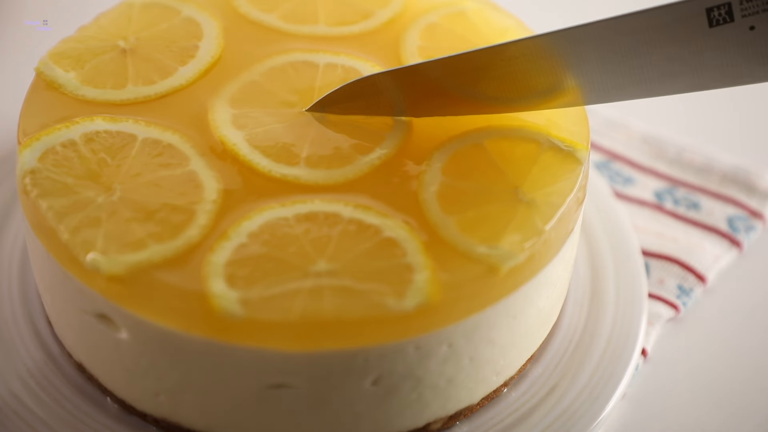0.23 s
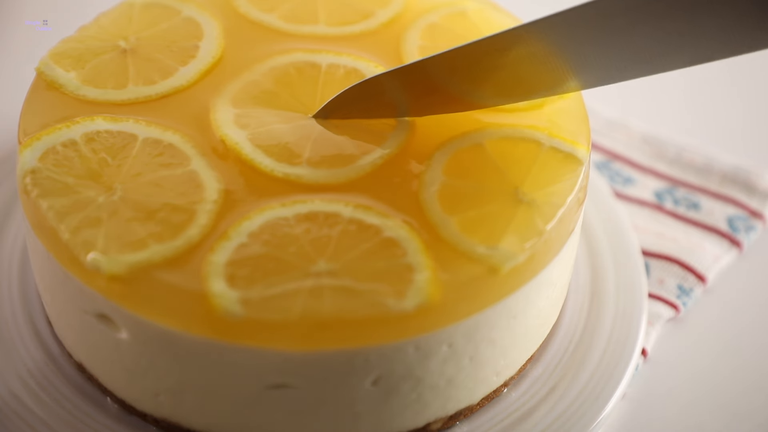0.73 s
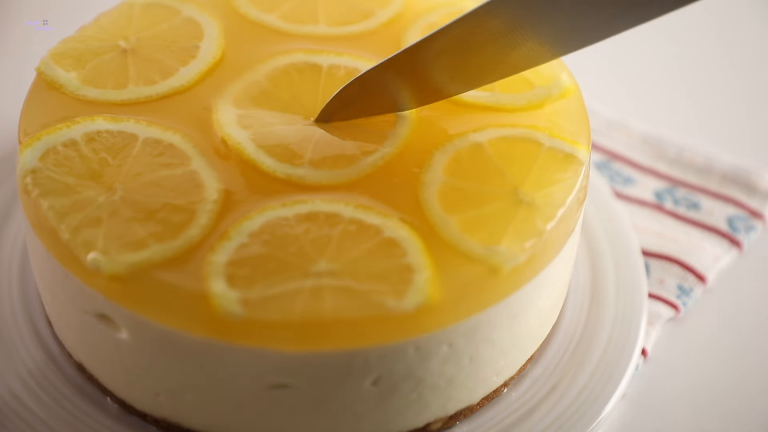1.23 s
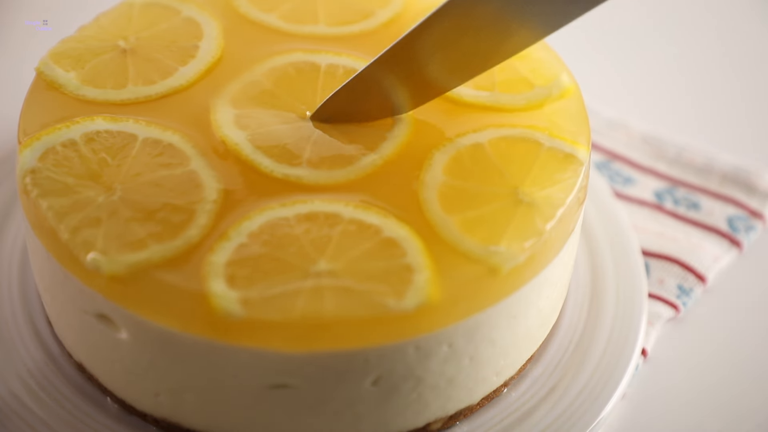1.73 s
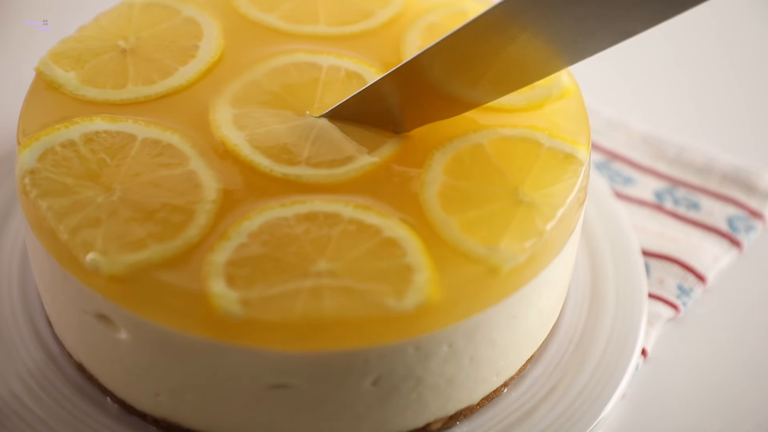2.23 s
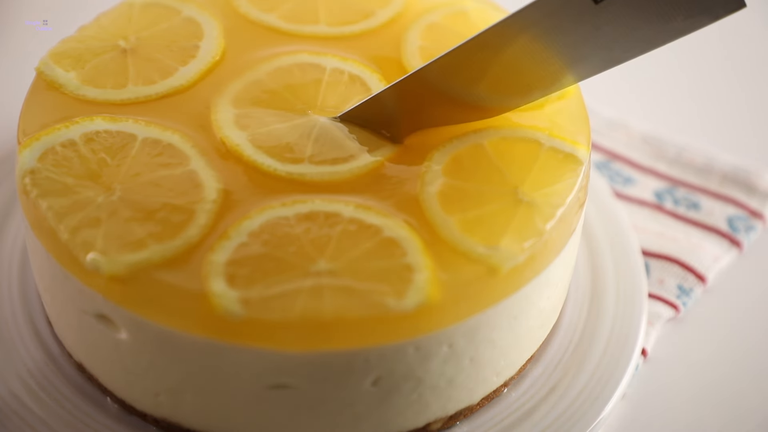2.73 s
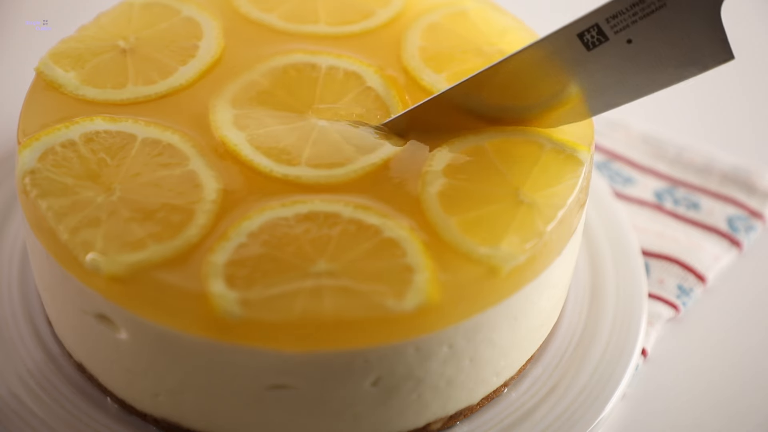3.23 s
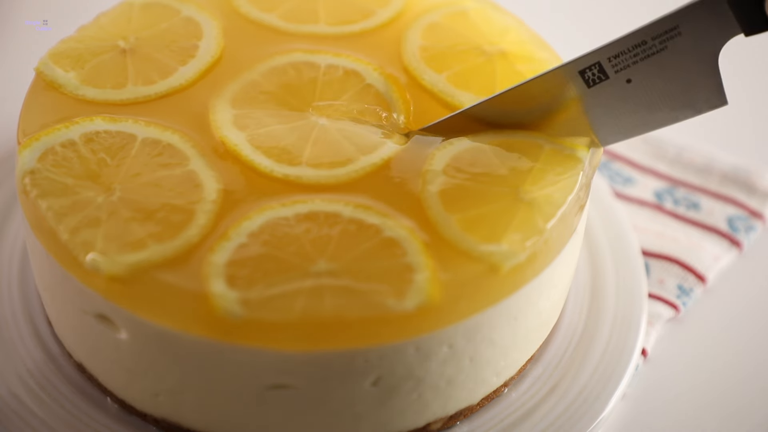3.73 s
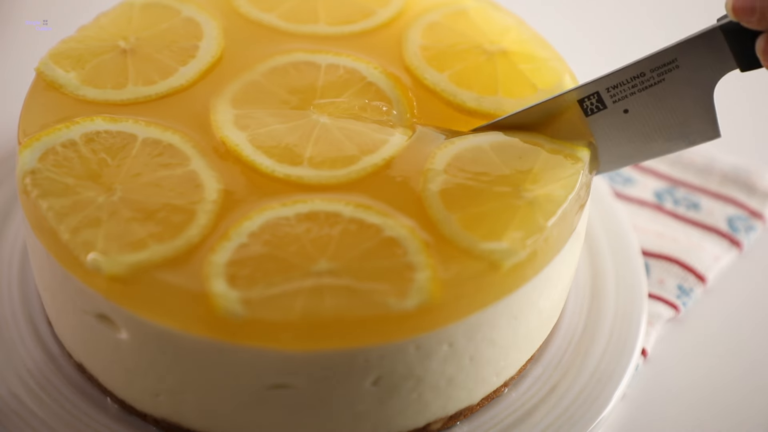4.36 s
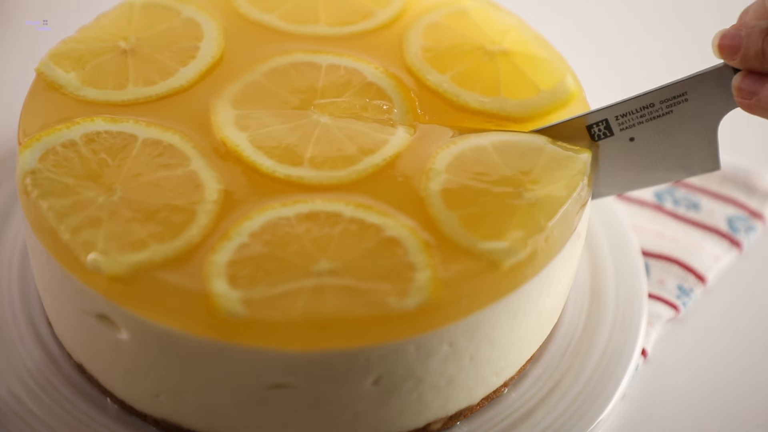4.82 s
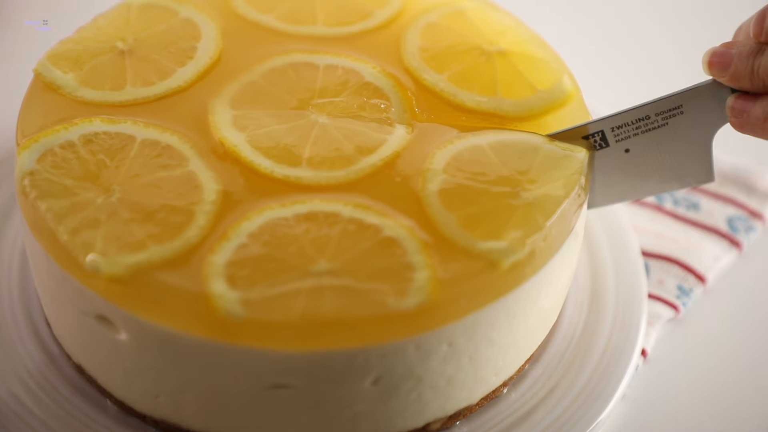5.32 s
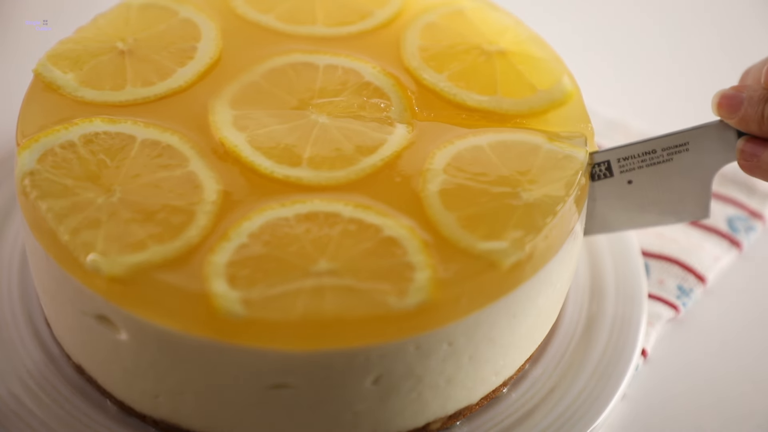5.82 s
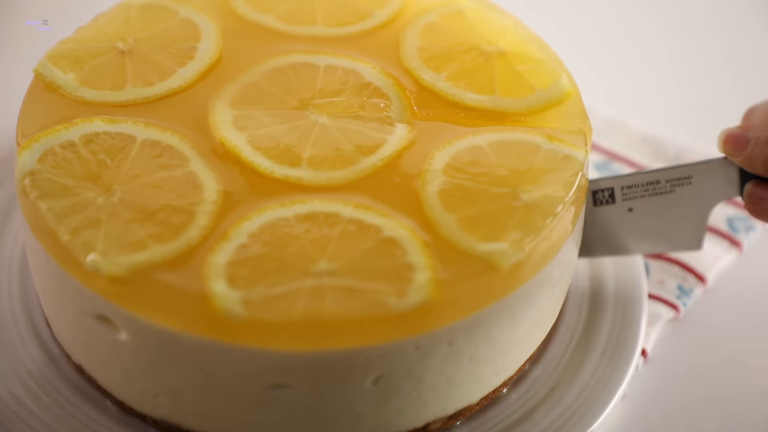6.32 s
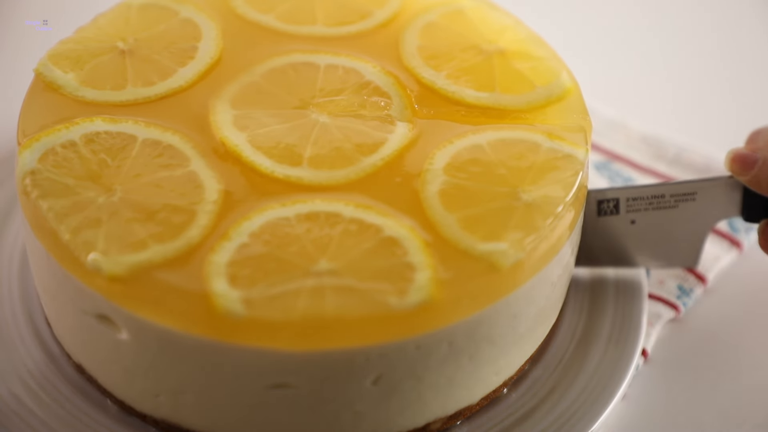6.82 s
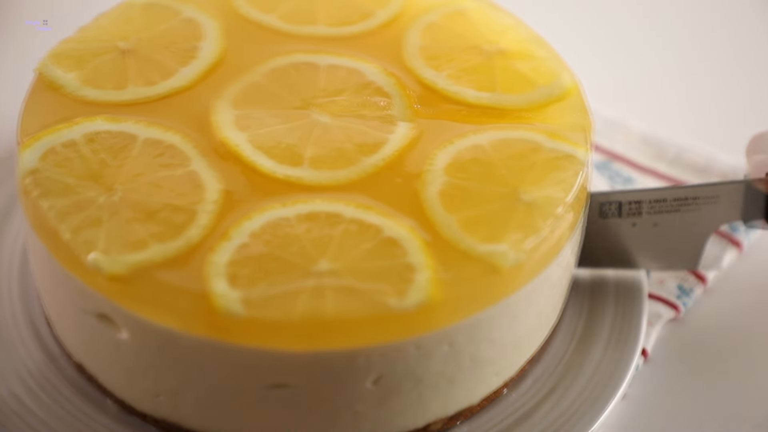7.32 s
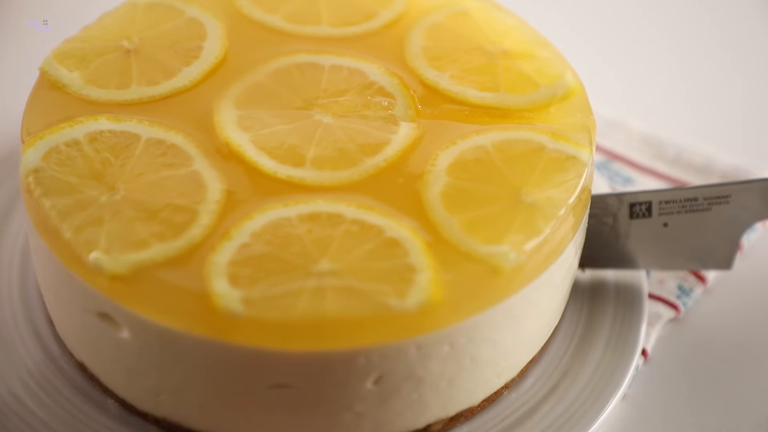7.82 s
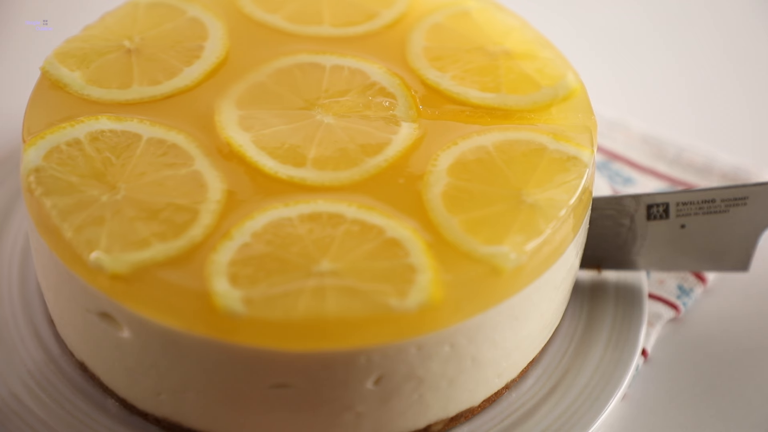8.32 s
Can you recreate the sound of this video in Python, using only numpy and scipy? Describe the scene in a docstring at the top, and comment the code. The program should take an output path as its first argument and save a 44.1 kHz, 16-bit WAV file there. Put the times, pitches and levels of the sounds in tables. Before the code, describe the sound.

A quiet room heard close to a plate, with steady soft hiss over low hum. Almost nothing until a small tick at 0.9 s. At 1.6-1.9 s a cluster of crisp bright snaps tears with a fine rustle, over soft knocks and a low table thump. A faint shift around 2.8 s leads to another sharp snap and short tear at 3.1 s, with a dull knock. Isolated ticks come at 3.9-4.1 s. From about 4.7 s the crumb base begins to crunch in light gritty strokes, denser by 5.4, with a stronger snap at 5.7. From 6.2 s the crunching swells rapidly to the loudest crack at 6.35 s, with plate knock and table thud. Another crunchy stroke at 6.5 and a thin ringing scrape fade by 6.8 s. Afterwards the hum sinks slightly; only tiny clicks until 8.5 s.

```python
"""A quiet room, heard by a microphone close to a plate: it hisses over a low hum, and soft knocks reach the plate.
A kitchen knife is pressed down through a jelly-topped cake; citrus rind and jelly snap as short ringing breaks
and tear in noise rustles, while plate and table answer through resonances.
The cake shifts softly, then the crumb base crunches in strokes of clumped grit through crumb and blade filters.
After the loudest crack the edge grazes glaze in thin modes and coasts to rest; a few small snaps follow."""
import sys
import numpy as np
from scipy import signal
from scipy.fft import rfft, irfft, next_fast_len
from scipy.io import wavfile
from scipy.ndimage import uniform_filter1d, map_coordinates

SR = 44100
rng = np.random.default_rng(int(sys.argv[2]) if len(sys.argv) > 2 else 0)


def pcm_store(signal):
    """Save signal as 16-bit PCM."""
    levels = np.round(np.clip(np.atleast_2d(signal), -1, 1) * 32767)
    wavfile.write(sys.argv[1], SR, levels.astype(np.int16).T)


def field_ratio(decibels):
    """Amplitude ratio for a level in dB (20 dB per decade); scalars and array-likes work."""
    return 10 ** (np.asarray(decibels, dtype=float) / 20)


N = 378378


def unit(x):
    """Scaled to rms 1."""
    return x / np.sqrt(np.mean(x ** 2) + 1e-20)


def along(points, hz):
    """(Hz, value) points read on a log frequency axis."""
    f, v = np.transpose(points)
    return np.interp(np.log(hz + 1), np.log(f + 1), v)


def gains(tables):
    """One gain per sample for each dB column, practically silent (-150 dB) outside the tables."""
    total = 0
    t = np.arange(N) / SR
    for rows in tables:
        s, *columns = np.transpose(rows)
        total = np.maximum(total, [field_ratio(np.interp(t, s, c, -150, -150)) for c in columns])
    return total


def filtered(x, response):
    """x shaped by a complex response of frequency."""
    m = next_fast_len(len(x) + SR // 2)
    return irfft(rfft(x, m) * response(np.fft.rfftfreq(m, 1 / SR)), m)[:len(x)]


def shaped(points):
    """Response that follows (Hz, dB) points."""
    return lambda hz: field_ratio(along(points, hz))


def resonant(modes):
    """Causal response of (Hz, width, dB) resonances, added with alternating sign."""
    def response(f):
        total = 0
        for k, (c, w, db) in enumerate(modes):
            total = total + (-1) ** k * field_ratio(db) * 1j * f * w / (c * c - f * f + 1j * f * w)
        return total
    return response


def hump(centre_hz, octaves):
    """A broad bell on a log frequency axis."""
    return lambda hz: np.exp(-(np.log2(hz / centre_hz + 1e-9) / octaves) ** 2)


def blend(x, a, b, share):
    """Crossfade at even power from x through response a to x through response b."""
    return np.sqrt(1 - share) * unit(filtered(x, a)) + np.sqrt(share) * unit(filtered(x, b))


def grit(rate, spread_db):
    """Random impulses of either sign, a few much larger than the rest; rate per second."""
    chance, sign, size = rng.random((3, N))
    sizes = field_ratio(-spread_db * np.log(size + 1e-4))
    return unit((chance < rate / SR) * np.sign(sign - .5) * sizes)


def wobble(rate):
    """A smooth random curve, rate knots a second."""
    return map_coordinates(rng.standard_normal(N // 400), [np.arange(N) * rate / SR])


def breaks(rate, spread_db, smooth):
    """Grit over a smoother rub, both coming in clumps."""
    return field_ratio(1.76 * wobble(70)) * (grit(rate, spread_db) + smooth * rng.standard_normal(N))


def burst(late, hz, cycles):
    """A ring that swells in a fraction of a cycle and dies after a few."""
    turns = late.clip(0) * hz
    swell = 1 - np.exp(-turns / .5)
    return swell * np.exp(-3 * turns / max(cycles, .3)) * np.sin(2 * np.pi * turns)


# Microphone hiss. Each row: frequency in Hz, relative level in dB.
HISS_SPECTRUM = [(100, -21.5), (170, -6), (288, -2.5), (355, -5.5), (437, -3), (548, -5.5), (580, -7),
                 (1380, -6.5), (2680, -8.5), (8480, -6), (15500, -15)]
# Low hum of the room, also the colour of the table rumble. Each row: frequency in Hz, relative level in dB.
HUM_SPECTRUM = [(20, -21), (38, -7.5), (58, -13), (74, -4), (87, -5.5), (105, -5.5), (124, -15), (156, -12),
                (190, -19), (290, -55.5), (480, -120)]
# Narrow lines in the hum. Each row: frequency in Hz, width in Hz, relative level in dB.
HUM_LINE_MODES = [(37.3, 2, -1.5), (92.1, 4.4, 8.5), (149.5, 2.1, 2)]
# The hum sinks for a while. Each row: time in seconds, change of level in dB.
HUM_SINKS = [(6.7, -1), (7.7, -4.5), (8.58, -3.5)]


def background():
    """Microphone hiss and room hum: shaped noise, the hum wavering in narrow resonances."""
    hiss = unit(filtered(rng.standard_normal(N), shaped(HISS_SPECTRUM)))
    hum_response = lambda hz: shaped(HUM_SPECTRUM)(hz) + np.abs(resonant(HUM_LINE_MODES)(hz))
    hum = unit(filtered(rng.standard_normal(N), hum_response))
    hum_db = -57.5 + np.interp(np.arange(N) / SR, *np.transpose(HUM_SINKS))
    return field_ratio(-56.0) * hiss + field_ratio(hum_db) * hum


# Plate modes. Each row: frequency in Hz, width in Hz, relative level in dB.
PLATE_MODES = [(414, 92, -8.5), (516, 69, 0.5), (630, 97, -1.5), (807, 94, -4)]
# Knocks passed on to the plate. Each row: contact in seconds, relative strength in dB, pitch in Hz.
PLATE_KNOCKS = [(0.117, -48, 487), (0.898, -37, 576), (1.001, -45, 646), (1.617, -29, 552),
                (1.62, -25, 484), (1.712, -29.5, 533), (1.779, -44, 390), (1.799, -41, 409),
                (1.813, -27, 511), (1.884, -47, 342), (1.902, -37, 506), (2.923, -35.5, 573),
                (2.979, -40.5, 406), (3.079, -44, 463), (3.097, -35, 573), (3.108, -22, 431),
                (3.11, -20.5, 720), (3.111, -31, 396), (3.796, -44, 692), (3.943, -40, 479),
                (4.053, -43, 484), (4.088, -46, 425), (4.289, -44.5, 646), (4.835, -39, 584),
                (5.038, -31.5, 528), (5.159, -36, 638), (5.279, -33, 498), (5.325, -43, 538),
                (5.691, -26, 630), (5.703, -24, 557), (5.719, -24, 493), (6.034, -43, 633),
                (6.118, -34.5, 353), (6.167, -26, 630), (6.267, -23, 635), (6.3, -18.5, 528),
                (6.352, -1.5, 484), (6.375, -16, 301), (6.517, -24, 824), (6.815, -43.5, 525),
                (7.354, -41.5, 385), (7.529, -41.5, 603), (7.705, -36.5, 600), (7.715, -36.5, 704),
                (7.766, -38, 708), (8.058, -44, 417), (8.428, -48.5, 315), (8.515, -38, 322),
                (8.517, -37, 655)]


def knocks():
    """A soft push of a few low cycles and a shorter overtone, just after contact, with the plate's own modes."""
    cycles, delay_s = 3.34, .0018
    out, blows = np.zeros(N + SR), np.zeros(N)
    t = np.arange(2000) / SR - delay_s
    for s, db, hz in PLATE_KNOCKS:
        push = burst(t, hz, cycles) + 0.32 * burst(t, 1.544 * hz, cycles)
        out[round(s * SR):][:len(t)] += field_ratio(db + 4.5) * push
        blows[round((s + delay_s) * SR)] = field_ratio(db + 13)
    return out[:N] + filtered(blows, resonant(PLATE_MODES))


# Table top modes. Each row: frequency in Hz, t60 in seconds.
TABLE_MODES = [(76, 0.28), (129, 0.32), (160, 0.19)]
# Pushes that shake the table. Each row: start in seconds, strength in dB,
# place in mode steps (0 stirs the first mode most, 2 the third).
TABLE_PUSHES = [(.887, -48, 2), (1.624, -28.5, .05), (1.712, -29.5, .03), (1.814, -37, .1),
                (3.115, -22, 0.14), (3.791, -45, 2.4), (5.07, -39, .4), (5.459, -30.5, .5),
                (5.55, -27.5, .03), (5.691, -27, 0.28), (5.9, -43.5, 1.05), (5.961, -37, 0.94),
                (6.265, -29, 1.05), (6.342, -16.5, 0.96), (6.51, -47, .1), (6.64, -37.5, 0.97),
                (8.515, -35.5, 1.8)]


def table(pressure):
    """Three low modes ring after each push, the lower two under steady pressure, over a broad rumble."""
    place_db = 13.5  # loss of a mode one step from the place
    push_rumble_db, push_rumble_t60_s = -25.5, 0.83  # level under the push
    # lower mode, upper mode, broad rumble: dB at full pressure, share of the pressure swing in dB
    shake_db, shake_follows = (-23.5, -11, -28), (0.76, 0.94, .65)
    smoothing_s = .04
    out, after, t = np.zeros(N + SR), np.zeros(N + SR), np.arange(SR // 2) / SR
    onset = 1 - np.exp(-t / 0.011)
    modes = np.array([field_ratio(-60 * t / t60) * np.sin(2 * np.pi * hz * t) * onset for hz, t60 in TABLE_MODES])
    for s, db, place in TABLE_PUSHES:
        steps = np.abs(np.arange(len(TABLE_MODES)) - place)
        out[round(s * SR):][:len(t)] += field_ratio(db - place_db * steps ** 1.2) @ modes
        after[round(s * SR):][:len(t)] += field_ratio(db + push_rumble_db - 60 * t / push_rumble_t60_s)
    load = np.abs(uniform_filter1d(pressure, size=round(smoothing_s * SR)))
    low, high, broad = (field_ratio(db) * load ** share for db, share in zip(shake_db, shake_follows))
    rumble = lambda mode: unit(signal.fftconvolve(grit(400, spread_db=3.0), mode)[:N])
    deep = unit(filtered(rng.standard_normal(N), shaped(HUM_SPECTRUM)))
    return out[:N] + low * rumble(modes[0]) + high * rumble(modes[1]) + (broad + after[:N]) * deep


# Snaps under the edge. Each row: start in seconds, relative level in dB, pitch of the bright ring in Hz,
# relative level of the dull part in dB.
EDGE_SNAPS = [(0.8876, -26, 5900, -21), (1.62, -20, 7660, -40), (1.6217, -22, 4730, -16),
              (1.6247, -17.5, 9490, -22), (1.7146, -22.5, 5070, -23), (1.8144, -31, 4930, -8),
              (1.8874, -39, 9030, -7.5), (1.9042, -28, 5930, -10.5), (2.795, -33, 8150, -13.5),
              (2.9242, -37, 5060, -7.5), (3.1079, -21.5, 5750, -2), (3.1097, -21.5, 4500, 3.5),
              (3.1133, -22, 5200, -14), (3.1921, -39, 9500, -25), (3.3299, -44, 6710, 0),
              (3.6803, -34, 4860, -20), (3.9457, -22.5, 6000, -19.5), (4.0553, -22, 4480, -8),
              (4.7396, -39, 7020, -10), (4.8287, -42.5, 6560, -2), (4.9383, -38, 5600, -9.5),
              (5.024, -34, 6840, -14), (5.0681, -29.5, 5710, -7.5), (5.1373, -33.5, 7550, -5.5),
              (5.2597, -37, 7420, -18), (5.2807, -40, 7370, 1.5), (5.3653, -32, 7360, -14),
              (5.4378, -33, 8490, -14), (5.4583, -24, 6220, -20), (5.4684, -29, 7240, -21),
              (5.5089, -26.5, 6400, -19), (5.5596, -22, 7600, -24), (5.5734, -29, 6690, -20),
              (5.588, -27.5, 5170, -24), (5.692, -14, 7130, -20), (5.7047, -19, 4800, -17),
              (5.7166, -36, 4930, -16), (5.878, -24.5, 9200, -21), (5.9863, -32, 8400, -6.5),
              (6.036, -29.5, 6690, -8.5), (6.1616, -34, 5620, 0), (6.1729, -26.5, 6650, -11.5),
              (6.205, -25.5, 5040, -11), (6.226, -25, 4500, -19.5), (6.2668, -13, 6240, -18.5),
              (6.2951, -12, 5170, -16.5), (6.3025, -14, 8000, -15), (6.3096, -7.5, 4850, -22.5),
              (6.316, -6, 8000, -20), (6.3285, -13.5, 5040, -1), (6.342, -7.5, 8240, -1),
              (6.3521, 2, 8170, -13), (6.3559, -7, 6890, -4), (6.384, -19.5, 5820, -5),
              (6.4247, -14.5, 7060, -7), (6.4347, -19, 4790, -14), (6.4663, -24, 6740, -8),
              (6.508, -25.5, 4500, -2.5), (6.5163, -20.5, 6230, -7.5), (6.536, -16, 5800, -13),
              (6.559, -15.5, 9100, -12), (6.5684, -16.5, 9100, -21), (6.5865, -23, 8700, -27),
              (6.594, -20.5, 6860, -27), (6.615, -27, 7030, -18), (6.634, -23.5, 6740, -8.5),
              (6.6997, -38, 9150, -9), (6.822, -38, 5780, -3.5), (7.3534, -30.5, 6870, -8.5),
              (7.509, -37.5, 5370, -8), (7.539, -33.5, 8370, -16), (7.5987, -29.5, 8900, -38),
              (7.7053, -40, 5470, -16), (7.7686, -38, 6220, -9), (7.956, -34, 5360, -20),
              (8.2056, -40.5, 5390, -9), (8.3968, -41.5, 6710, -3), (8.4788, -26, 8700, -20),
              (8.4914, -36, 6680, -9)]


def snaps(rows):
    """Each snap is a short tear of several breaks, with a bright ring and a duller, lower part."""
    base_cycles, tear_s = 2.31, 0.001568  # cycles of a 6 kHz, -25.5 dB snap
    cycles_grow = .12  # strong snaps ring longer: dB of cycles per dB of strength
    out, t = np.zeros(N + SR), np.arange(600) / SR
    for s, db, hz, dull_db in rows:
        when, bend, weak, low = rng.random((4, 5, 1))
        when[0], bend[0], weak[0] = 0, .5, 0  # the first break is the strongest
        late, size = t - tear_s * when, field_ratio(-16 * weak)
        cycles = base_cycles * (hz / 6000) ** .6 * field_ratio(cycles_grow * (db + 25.5))
        bright = np.sum(size * burst(late, hz * np.exp(.35 * (bend - .5)), cycles), axis=0)
        dull = np.sum(size * burst(late, 1600 * np.exp(1.0 * low), 1.12), axis=0)
        snap = bright / bright.max() + field_ratio(dull_db + 5) * dull / dull.max()
        out[round(s * SR):][:len(t)] += field_ratio(db) * snap

    def less_top(hz):  # the snaps lose their top above about 10 kHz
        x = hz / 9800
        return 1 / (1 + 1.5j * x - x ** 2) / (1 + .7j * x - x ** 2)
    return filtered(out[:N], less_top)


# Bright colour of tearing rind. Each row: frequency in Hz, relative level in dB.
RIND_SPECTRUM = [(2060, -48), (3500, -13), (4720, 4.5), (7080, 2.5), (12800, -6), (15500, -25)]
# The rind goes on tearing after a big snap. Each row: peak in seconds, rustle in dB,
# relative level of the dull part in dB, t60 of the fray in seconds.
RIND_TEARS = [(1.62, -25.5, -35.5, 0.23), (1.715, -35.5, -40.5, .25), (1.815, -44, -52, 0.14),
              (3.11, -31.5, -22.5, 0.19), (5.694, -38, -54, .3), (7.542, -53, -58, .1)]


def tears():
    """Fibres part in a fine, even, bright rustle: a fast build-up, a short rip, a longer fray."""
    rise_db_per_s, rip_t60_s, fray_start_db = 4500, 0.033, -11
    level, t = np.zeros((2, N)), np.arange(N) / SR
    for s, rustle_db, dull_db, fray_s in RIND_TEARS:
        late = (t - s).clip(0)
        rise = field_ratio(rise_db_per_s * (t - s).clip(None, 0))
        rip = field_ratio(-60 * late / rip_t60_s)
        fray = field_ratio(fray_start_db - 60 * late / fray_s)
        rustle = field_ratio(rustle_db) * np.maximum(rip, fray)
        dull = field_ratio(dull_db) * np.maximum(rip, field_ratio(-6.5) * fray)
        level += rise * [rustle, dull]
    fibres = grit(5000, spread_db=5.0) + 1.2 * rng.standard_normal(N)
    bright = level[0] * unit(filtered(fibres, shaped(RIND_SPECTRUM)))
    return bright + field_ratio(-3.5) * level[1] * unit(filtered(fibres, hump(2950, 0.53)))


# The cake shifts softly on the plate. Each row: time in seconds, relative level in dB.
CAKE_SHIFTS = [
    [(2.73, -71), (2.78, -51.5), (2.83, -50.5), (2.91, -74)],
    [(7.3, -74.5), (7.348, -65), (7.532, -63), (8.05, -69), (8.15, -70)],
]
# The pressed base. Each row: frequency in Hz, width in Hz, relative level in dB.
BASE_MODES = [(228.4, 100, -9), (292, 42, 0), (364, 57, -8)]


def pressed_plate(coarse, pressure, hard):
    """Coarse grit drives the plate under pressure and shifts; in the hard base the grind deepens."""
    force = pressure + gains(CAKE_SHIFTS)[0]
    return force * blend(coarse, resonant(PLATE_MODES), resonant(BASE_MODES), 0.38 * hard)


# Colour of the crumbling. Each row: frequency in Hz, relative level in dB.
CRUMB_SPECTRUM = [(1500, -41.5), (3000, -18.5), (4700, -3.5), (6500, 3.5), (8500, 4), (10000, -3.5),
                  (12000, -30), (15500, -40.5)]


def crumbs(fine, crackle):
    """Crumbs break as fine grit, brightest around 7 kHz."""
    return crackle * unit(filtered(fine, shaped(CRUMB_SPECTRUM)))


# Upper blade modes. Each row: frequency in Hz, width in Hz, relative level in dB.
BLADE_UPPER = [(3260, 290, -9.5), (4030, 110, 2)]
# Lower blade modes. Each row: frequency in Hz, width in Hz, relative level in dB.
BLADE_LOWER = [(1224, 110, -10), (1844, 120, 7), (2440, 120, -12)]


def blade(fine, coarse, rubbing, hard):
    """In soft cake the rubbed blade hums in thin modes; in the hard base the scrape turns broad."""
    upper, lower = field_ratio((-1.5, -1.5))[:, None] * rubbing
    first_mode = resonant(BLADE_LOWER[:1])
    low_scrape = lambda hz: hump(1900, .7)(hz) + 1.55 * first_mode(hz) / field_ratio(BLADE_LOWER[0][2])
    steel = upper * blend(fine, resonant(BLADE_UPPER), hump(3780, 0.7), hard)
    return steel + lower * blend(coarse, resonant(BLADE_LOWER), low_scrape, hard)


# Strokes through the crumb base. Each row: time in seconds, then relative levels in dB
# of pressure, crumbling and blade rubbing.
BASE_STROKES = [
    [(4.55, -71, -66, -71), (4.59, -66, -60, -62.5), (4.75, -62.5, -61, -66), (4.832, -65, -65, -64.5),
     (4.968, -52.5, -58, -60.5), (5.084, -42.5, -44.5, -49.5), (5.134, -51.5, -53, -57),
     (5.166, -41.5, -44.5, -55), (5.206, -57, -65, -60.5), (5.276, -48.5, -56, -56), (5.31, -54, -60, -66)],
    [(5.31, -53, -56, -57.5), (5.426, -47, -45.5, -56.5), (5.504, -43.5, -42, -56),
     (5.566, -45.5, -41.5, -56), (5.646, -49.5, -50.5, -58.5), (5.682, -50, -53, -66),
     (5.692, -56, -53, -53), (5.724, -38.5, -38, -48.5), (5.782, -45, -52, -57), (5.864, -65, -58, -63)],
    [(5.864, -65, -53, -64), (5.885, -53.5, -49.5, -58.5), (5.98, -46, -55, -55.5),
     (6.056, -42.5, -47, -48.5), (6.108, -47.5, -55, -53), (6.18, -34, -44.5, -44.5),
     (6.262, -32, -35.5, -44), (6.29, -26, -33, -34), (6.305, -21, -26, -29), (6.34, -18.5, -17.5, -26),
     (6.355, -14.5, -10, -25), (6.363, -19.5, -36.5, -28), (6.385, -30, -43, -37.5),
     (6.466, -34.5, -36, -36.5), (6.49, -53.5, -48, -51.5)],
    [(6.49, -56, -46, -47), (6.538, -24.5, -32, -31.5), (6.584, -49, -56, -53.5), (6.638, -41, -44, -43.5),
     (6.664, -57, -61, -67), (6.712, -55, -52, -54.5), (6.766, -77, -76, -83)],
]
# How far the edge is into the hard base. Each row: time in seconds, share from 0 to 1.
EDGE_DEPTH = [(4.5, 0.25), (5.6, 0.32), (5.72, 0.8), (5.9, 0.55), (6.2, 1), (6.35, 0.65), (6.8, 0.5)]


def strokes():
    """Each stroke drives crumbs, blade and plate from shared clumped grit; also returns the pressure."""
    pressure, crackle, rubbing = gains(BASE_STROKES)
    hard = np.interp(np.arange(N) / SR, *np.transpose(EDGE_DEPTH)).clip(0, 1)
    fine = breaks(4000, spread_db=4.5, smooth=0.95)
    coarse = breaks(1800, spread_db=3.5, smooth=1.1)
    crunch = field_ratio(-4.0) * crumbs(fine, crackle) + blade(fine, coarse, rubbing, hard)
    return crunch + field_ratio(-2.0) * pressed_plate(coarse, pressure, hard), pressure


# The edge grazes the glaze. Each row: time in seconds, strength in dB.
GLAZE_GRAZES = [(6.5, -52), (6.532, -43), (6.595, -38), (6.605, -47), (6.617, -36), (6.625, -46),
                (6.64, -36), (6.652, -62), (6.69, -66), (6.705, -54), (6.72, -75)]
# Thin upper modes on glaze. Each row: frequency in Hz, width in Hz, relative level in dB.
GLAZE_UPPER = [(2715, 140, -6), (4500, 83, 3.5), (6620, 120, -13), (9150, 120, -8)]
# Lower ring; the second row takes over as the edge slows.
# Each row: frequency in Hz, width in Hz, relative level in dB.
GLAZE_LOWER = [(1560, 34, -6), (1248, 60, -1.5)]


def graze(snapping):
    """Steel catching and chattering on glaze rings thin modes of the plate; a lower ring sinks as the edge slows."""
    on_glaze_s = (6.5, 6.85)  # while the edge rides on the plate
    slowing_s, slow_ring_db, slow_fade_db = (6.62, 6.78), -45.5, -14.5  # span, level, change by the end
    t, strength = np.arange(N) / SR, gains([GLAZE_GRAZES])[0]
    catches = snapping * (t > on_glaze_s[0]) * (t < on_glaze_s[1])
    chatter = breaks(700, spread_db=3.0, smooth=.4)
    slow = np.interp(t, slowing_s, [0, 1])
    first, second = (unit(filtered(chatter, resonant([mode]))) * field_ratio(mode[2]) for mode in GLAZE_LOWER)
    ring = strength * unit(filtered(chatter, resonant(GLAZE_UPPER)))
    ring += field_ratio(9) * filtered(catches, resonant(GLAZE_UPPER))
    edges = (slow * 8).clip(0, 1) * ((1 - slow) * 8).clip(0, 1)  # fades in and out
    coasting = field_ratio(slow_ring_db + slow_fade_db * slow) * edges
    return ring + coasting * (np.sqrt(1 - slow) * first + slow * second)


# Near surfaces. Each row: delay in seconds, level over the direct sound in dB.
NEAR_ECHOES = [(.002, -23.5), (.0045, -22), (.008, -17.5)]
# Decay of the room. Each row: frequency in Hz, t60 in seconds.
ROOM_DECAY = [(300, 0.41), (2000, 0.26), (6000, 0.13), (14000, 0.13)]


def room(x):
    """A few near echoes, then a noise tail that dies band by band, drawn anew each quarter second."""
    out, step = np.pad(x, (0, SR)), SR // 4
    for delay, db in NEAR_ECHOES:
        out[round(delay * SR):][:N] += field_ratio(db) * x
    for start in range(0, N, step):
        hz, t, z = signal.stft(rng.standard_normal(SR // 2), SR, nperseg=256)
        decay = field_ratio(-60 * t / along(ROOM_DECAY, hz)[:, None])
        tail = signal.istft(z * decay, SR, nperseg=256)[1]
        wet = signal.fftconvolve(x[start:start + step], tail / np.linalg.norm(tail))
        out[start + 200:][:len(wet)] += field_ratio(-15.0) * wet
    return out[:N]


def scene():
    """Knife sounds in the room, with table thuds and background."""
    crunch, pressure = strokes()
    snapping = snaps(EDGE_SNAPS)
    knife = room(snapping + knocks() + crunch + tears() + graze(snapping))
    # the microphone takes in little deep bass from knife and table
    little_deep_bass = lambda hz: (1j * hz / (45 + 1j * hz)) ** 2
    return (filtered(knife + table(pressure), little_deep_bass) + background())[None]


def low_pass(x):
    """Removes everything above the highest recorded frequency."""
    return signal.sosfilt(signal.butter(12, 15660, fs=SR, output="sos"), x)


def record(dry):
    """The loudest cracks round off at full scale."""
    mix = dry / (1 + np.abs(dry) ** 8) ** (1 / 8)
    return low_pass(mix)


dry = scene()
out = record(dry)
pcm_store(out)
```